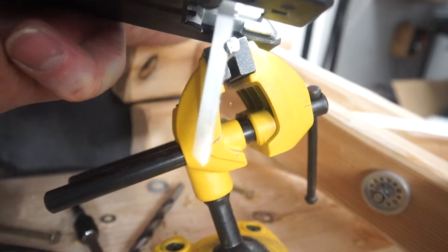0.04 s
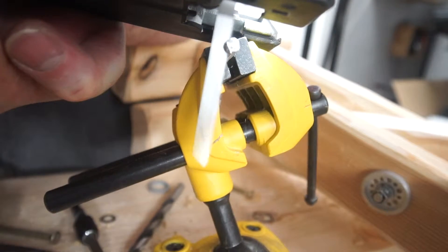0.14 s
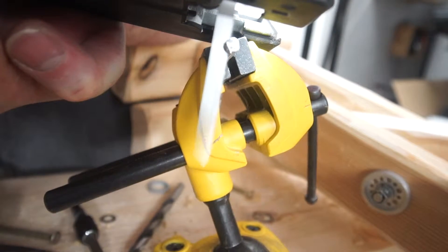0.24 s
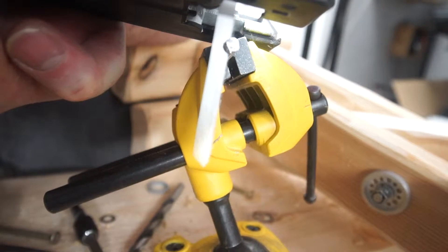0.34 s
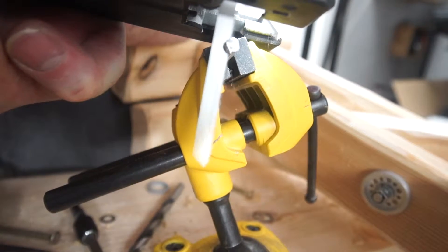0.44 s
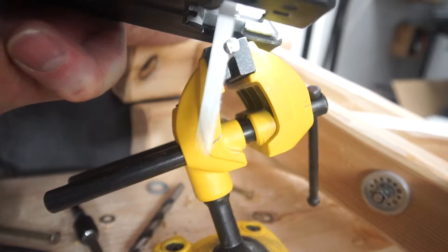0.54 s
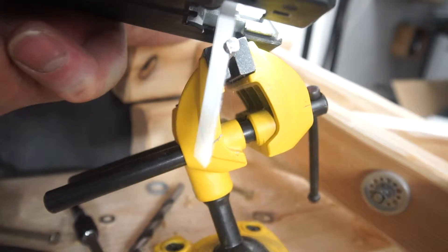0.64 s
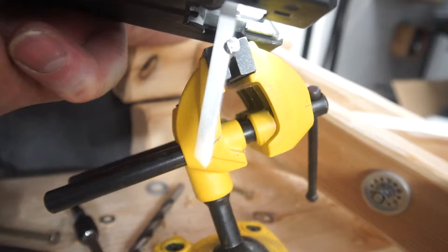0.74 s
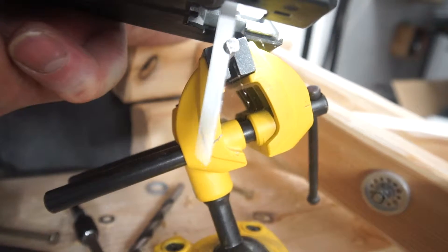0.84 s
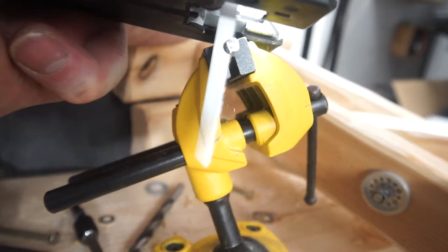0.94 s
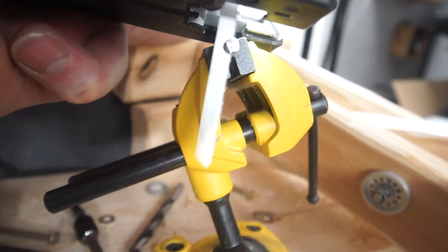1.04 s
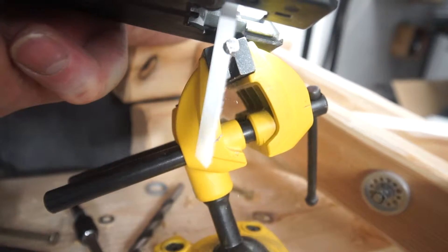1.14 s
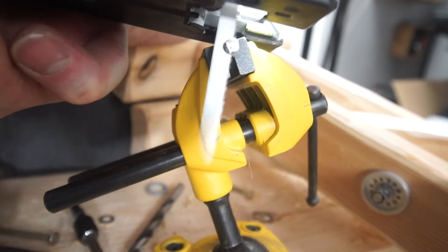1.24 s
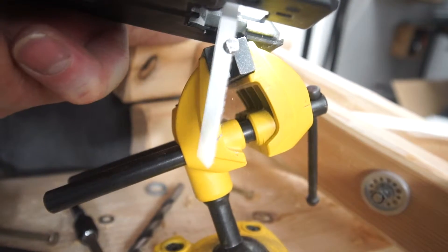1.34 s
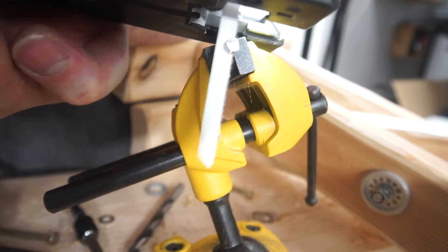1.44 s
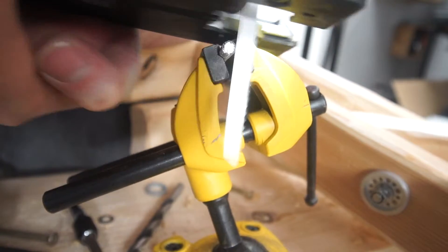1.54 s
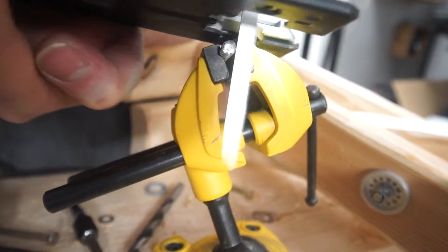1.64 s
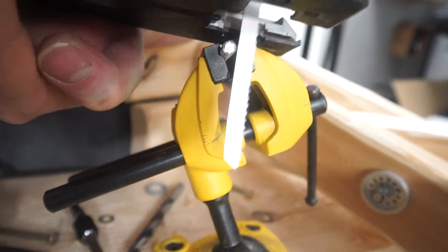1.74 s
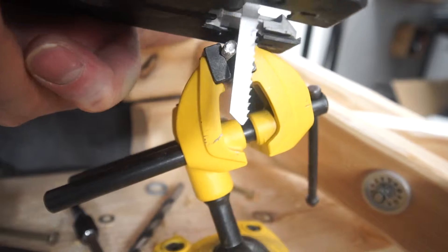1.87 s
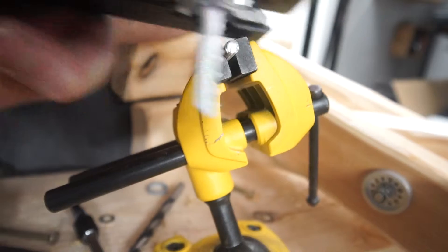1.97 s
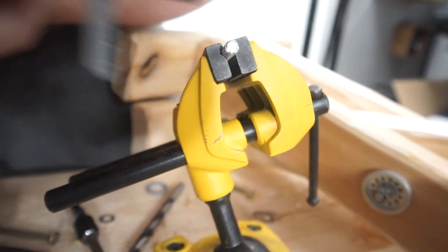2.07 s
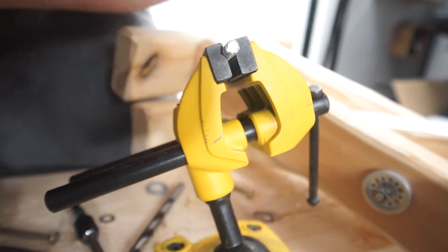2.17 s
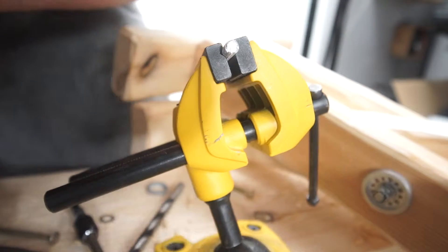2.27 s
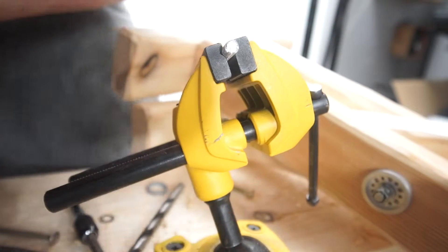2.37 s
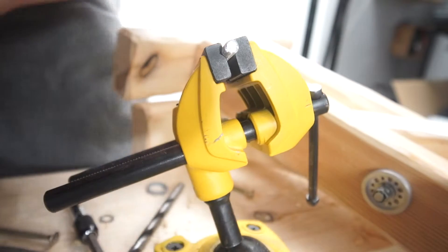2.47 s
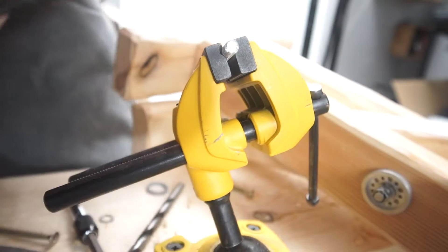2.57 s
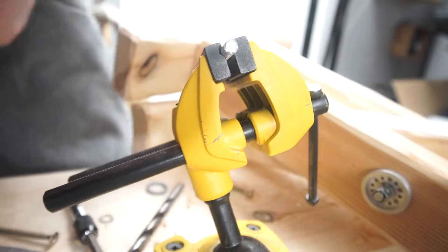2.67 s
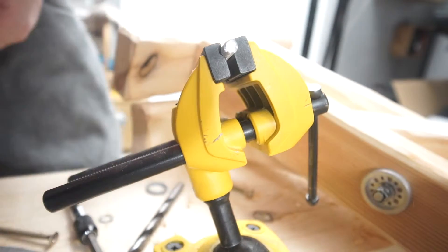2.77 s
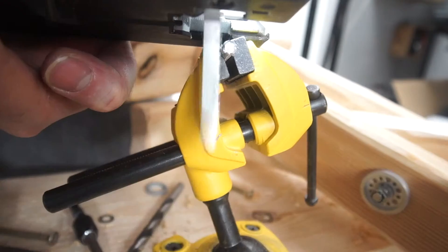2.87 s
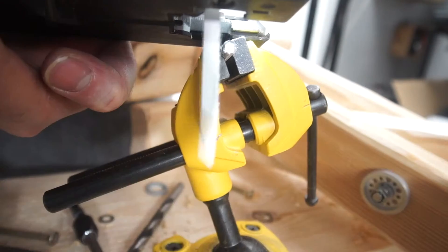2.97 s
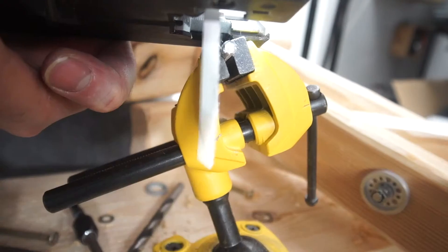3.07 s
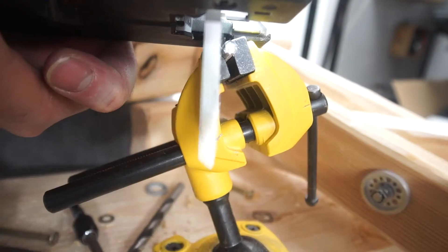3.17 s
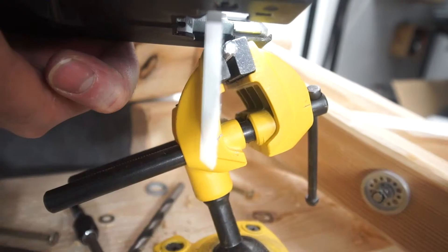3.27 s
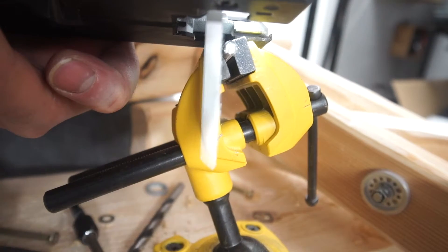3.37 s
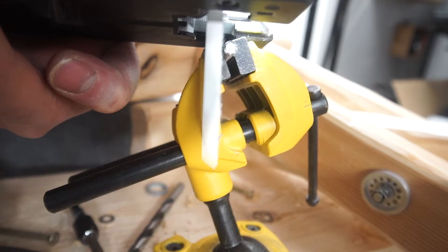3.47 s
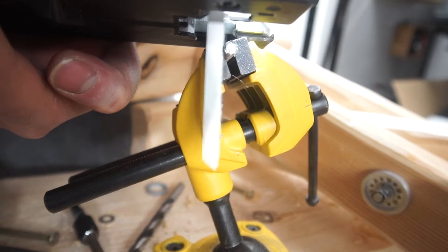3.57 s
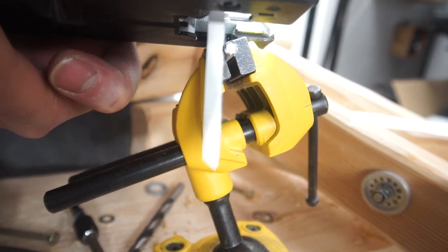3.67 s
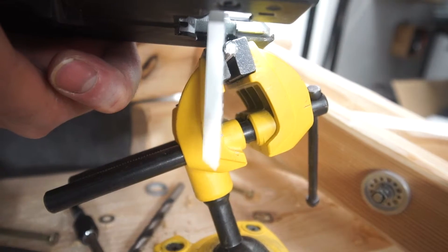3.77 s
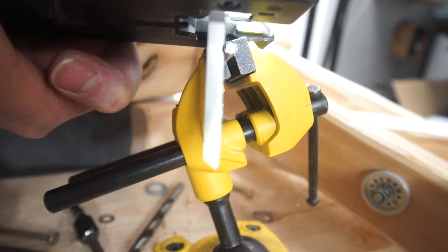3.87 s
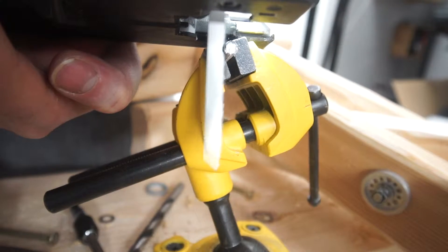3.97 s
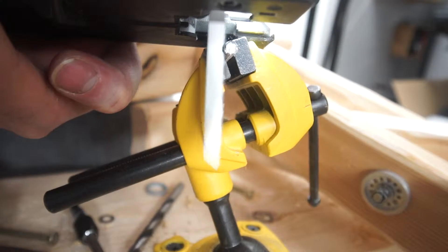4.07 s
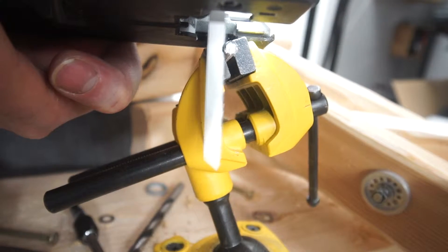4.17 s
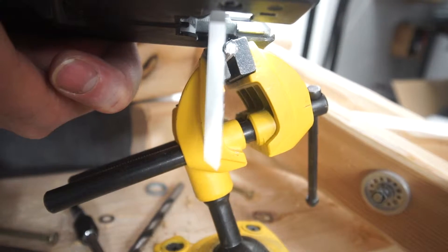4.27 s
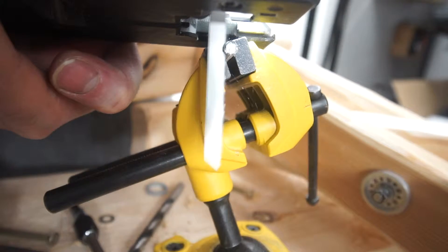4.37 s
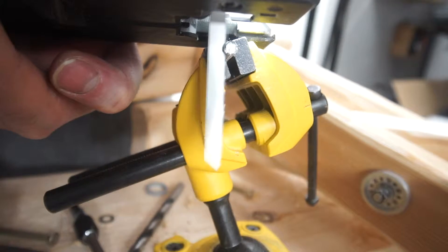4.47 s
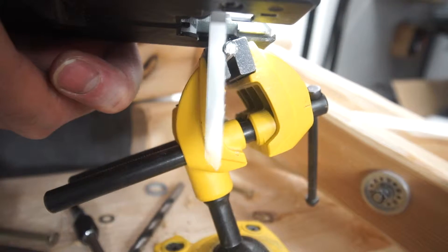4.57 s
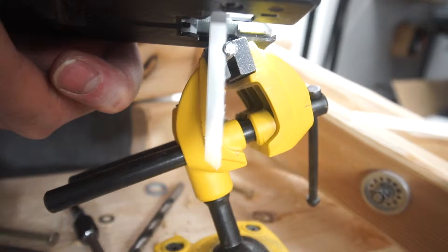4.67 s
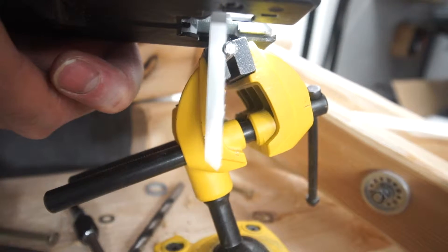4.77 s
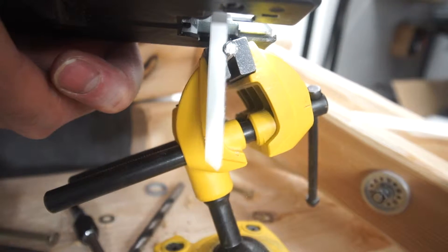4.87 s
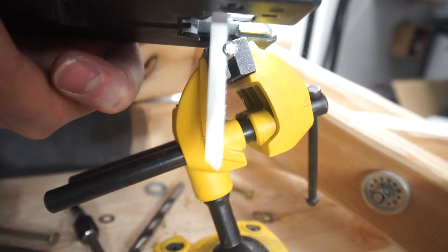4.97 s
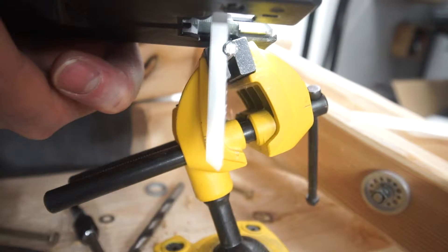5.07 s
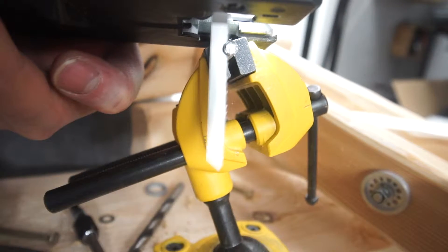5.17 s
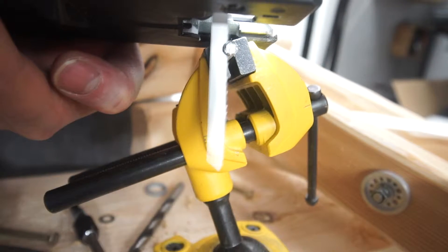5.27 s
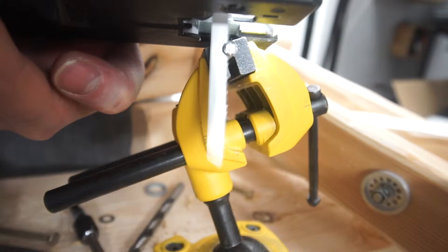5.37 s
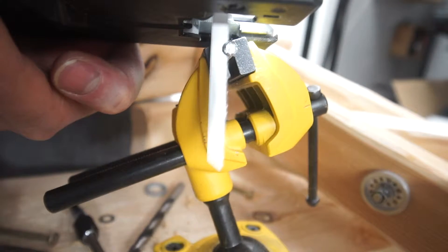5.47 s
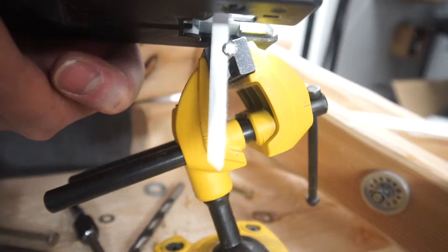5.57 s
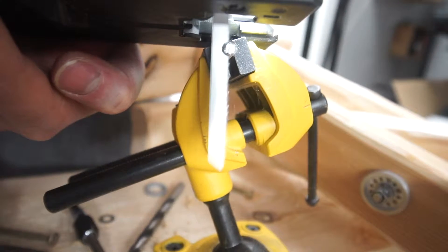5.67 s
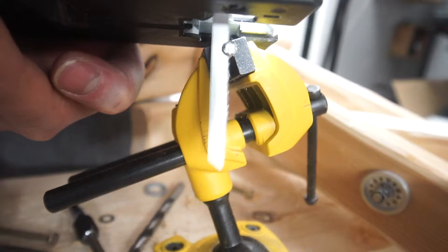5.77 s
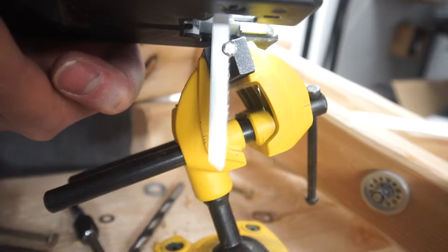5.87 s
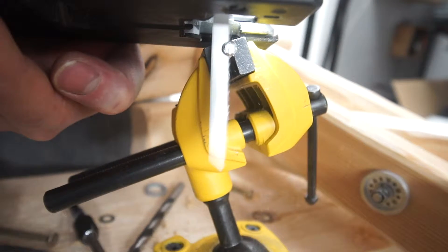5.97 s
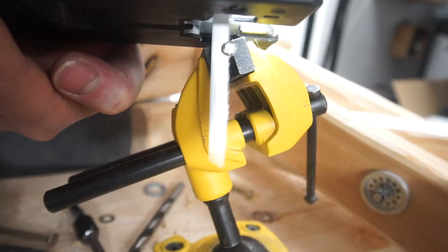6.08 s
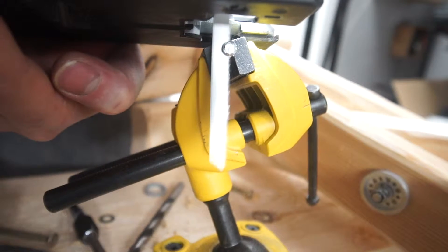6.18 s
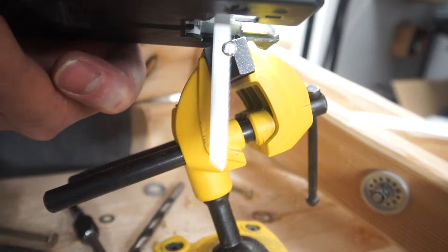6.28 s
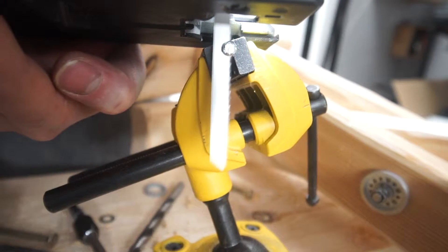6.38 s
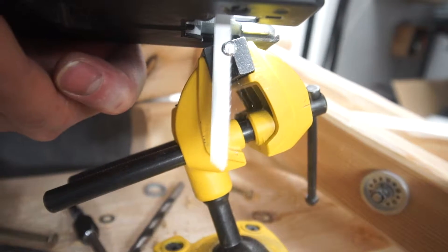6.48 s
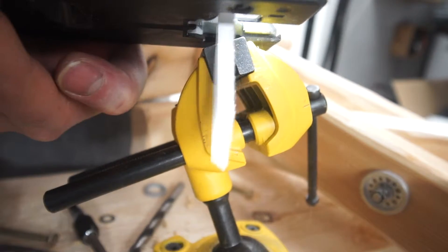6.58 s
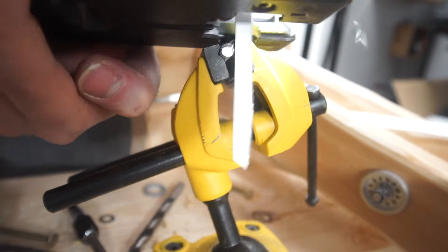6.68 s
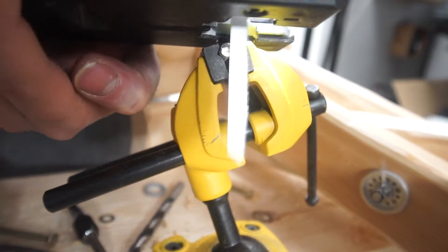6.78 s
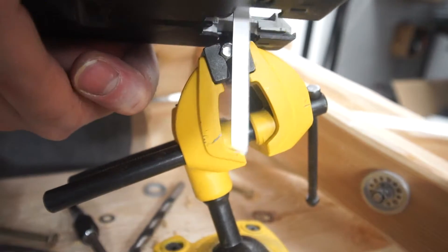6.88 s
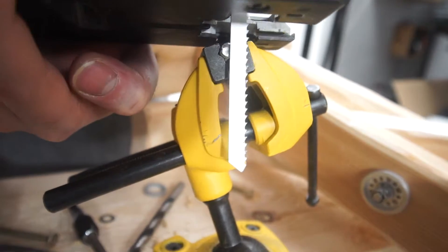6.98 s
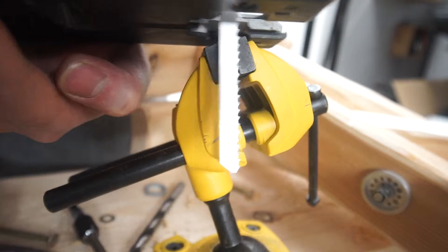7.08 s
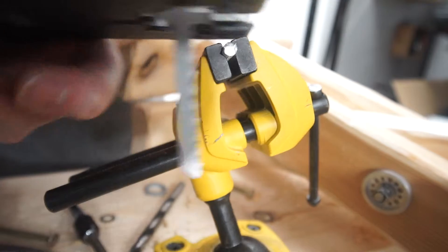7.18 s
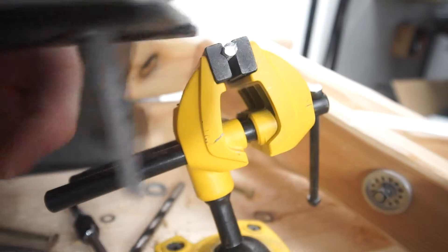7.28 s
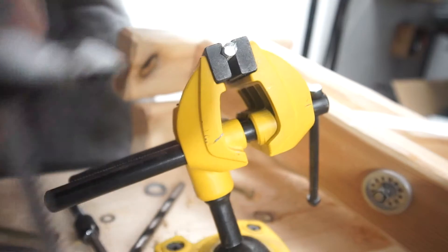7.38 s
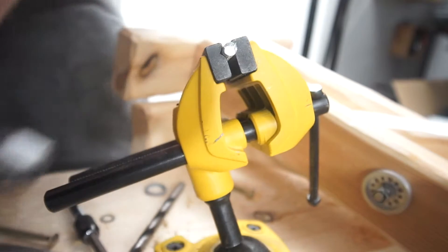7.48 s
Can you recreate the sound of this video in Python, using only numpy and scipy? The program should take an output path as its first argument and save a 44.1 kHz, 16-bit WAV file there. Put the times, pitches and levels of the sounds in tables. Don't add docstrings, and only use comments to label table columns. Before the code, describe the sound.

A handheld electric jigsaw rasps and buzzes through a clamped steel rod, stops with clicks and soft thuds, then restarts, cuts again and stops.

```python
import sys
import numpy as np
from scipy import signal
from scipy.fft import rfft, irfft, next_fast_len
from scipy.io import wavfile
from scipy.ndimage import uniform_filter1d, map_coordinates

SR = 44100
rng = np.random.default_rng(int(sys.argv[2]) if len(sys.argv) > 2 else 0)


def level_to_linear(level):
    exponent = np.asarray(level, float) / 20
    return 10 ** exponent


def waveform_to_disk(signal):
    frames = np.transpose(np.atleast_2d(signal))
    scaled = np.clip(frames, -1, 1) * 32767
    samples = np.round(scaled).astype(np.int16)
    wavfile.write(sys.argv[1], SR, samples)


N = 331493

# start_s, teeth_touch_s, teeth_lift_s, trigger_off_s, tool_muffled_s
RUNS = [
    (-1, -1, 1.535, 1.725, 1.78),
    (2.953, 3.1, 6.57, 6.82, 6.9),
]
BITE_AT = [.2015, 3.348]
# time_s, strokes_per_s
LOADED_SPEED = [
    [(0, 37.0), (1.5, 37.0)],
    [(3.3, 41), (3.51, 42), (3.64, 41.15), (3.78, 41.75), (4.42, 41.8), (4.53, 41.35), (6.0, 41.35),
     (6.5, 41.05)],
]
FREE_SPEED = [38.1, 41.86]
BRAKE = [72, 95]
GEAR, FAN_BLADES, SEGMENTS = 9.2, 15, 29
UNLOAD_S = .1
COAST_DB = -18

# pitch_hz, level_db_per_hz
WHIR = [
    [(35, -68.5), (60, -27), (153, 4.5), (288, -39.5), (343, -17), (391, -44.5), (497, 8), (1020, 2),
     (1420, 8), (1720, 4), (2100, 1.5), (2850, -1), (11000, -4), (14300, -102.5), (22000, -120)],
    [(35, -54.5), (60, -15.5), (160, -11), (270, -25), (383, -41), (646, -8.5), (1160, -0.5), (1360, -2.5),
     (2780, -4), (5020, -7.5), (5840, -5), (6380, -12.5), (11000, -10), (14300, -103), (22000, -120)],
]
# pitch_hz, width_hz, level_db
HOUSING = [
    [(1020, 110, 0), (1200, 70, -3), (1720, 110, 2), (2650, 260, -5), (3170, 160, -6)],
    [(1160, 60, -2), (1730, 150, -7), (2780, 220, -8), (3170, 120, -5), (540, 120, -6)],
]
# hum_free_db, hum_loaded_db
WHIR_DB = [(-36.5, -42, -39, -42.5, -14, -17), (-33.5, -36, -39.5, -37, -17.5, -26.5)]
IDLE_SHAKE_DB = [-29.5, -36]
IDLE_SHELL_DB = [5.5, -0.5]
IDLE_RUMBLE_DB = [-21, -33.5]

# time_s, push_db, lean_to_vise_db, bite_sharpness
PUSH = [
    [(0, -35.5, 3.5, 0.86), (.25, -36.5, -3, 0.85), (.5, -36, -4, 0.97), (.7, -37, -4, 1),
     (.9, -37, -2.5, 1), (1.1, -38, -0.5, 1), (1.3, -38, 0, 1), (1.45, -39, 6.5, 1), (1.53, -37.5, 5, 0.95)],
    [(3.2, -41.5, 6.5, 1), (3.3, -42.5, 11.5, 1), (3.55, -38.5, 7, 1.1), (3.8, -38.5, 6.5, 1.2),
     (3.96, -41.5, 5, 0.88), (4.15, -38, 4, 1), (4.45, -37.5, 0.5, 0.79), (4.75, -35.5, 0.5, 0.78),
     (5.1, -37, -0.5, 0.76), (5.55, -37.5, -8.5, 1.15), (5.85, -36.5, -4, 0.93), (6.1, -37.5, -6, 1.5),
     (6.35, -38, -2, 0.71), (6.55, -36.5, 4.5, 1.2)],
]
# vise_db, rod_db, blade_db, bench_shake_db
PART_DB = [(-9.5, -7.5, -7, -24), (-8.5, -5, -7, -21.5)]
LIFT_DB_PER_S = [-1000, -110]
# pitch_hz, width_hz, level_db, lag_strokes
RINGS = [
    [(452.6, 12, 1, 0.51), (535, 67, -4.5, 0.43), (835, 78, 1.5, -.05), (1170, 50, -6.5, -0.15),
     (1692, 97, 2.5, 0.11), (1895, 73, 2, 0.12), (2108, 34, 3, 0.13), (2893, 100, -1, 0.09),
     (3123, 120, 0, .02), (3450, 110, -9, 0.074), (3710, 39, -6.5, 0.18), (5800, 230, -3.5, -0.046),
     (7400, 87, -8.5, -0.089), (9230, 95, -12.5, 0.3)],
    [(467, 45, 0.5, 0.35), (485, 41, -6, 0.38), (947, 67, 1, -0.075), (1149, 48, -6.5, -0.25),
     (1424, 54, -0.5, 0.14), (1704, 58, -9, .05), (1950, 44, -4, .05), (2111, 28, 0, .05),
     (2164, 16, -0.5, .05), (2520, 100, -1.5, 0.074), (2880, 240, 0, 0.046), (3420, 130, -5.5, 0.04),
     (3650, 50, -11.5, 0.18), (9230, 43, -10, 0.066)],
]
# pitch_hz, share_0_to_1
FOLLOW = [(500, .35), (900, .7), (2150, .5), (2850, .8), (3460, .9), (5500, .5), (9000, .4)]
# time_s, pitch_ratio
JAW = [
    [(0, 1), (1.5, 1)],
    [(3.3, .97), (3.5, 1.04), (3.6, 1.08), (3.66, 1.04), (3.85, 1.14), (4.25, 1.17), (5.0, 1.17),
     (5.6, 1.1)],
]
JAW_STEADY = [.6, .85]
# pitch_hz, level_db_per_hz
RASP = [(59, -18.5), (100, -7.5), (267, -4), (532, 1), (635, -8), (2150, 1.5), (2330, 2), (3450, -11),
        (3960, -4), (11000, -8.5), (14300, -86), (22000, -120)]
SQUEAL_HZ = [3485, 3440]
# stroke_multiple, level_db
SHAKE = [
    [(1, 2.5), (2, -7.5), (3, -9), (4, -7.5), (5, 0), (6, -1.5), (7, 3), (8, -7.5), (9, 5), (10, -26),
     (11, -5)],
    [(1, 0.5), (2, 2), (3, 3.5), (4, 7), (5, -27), (6, -3), (7, -19.5), (8, 3), (9, -41), (10, -23),
     (11, -19.5)],
]

# pitch_hz, likeness_0_to_1
SAME = [(60, 1), (350, 0.94), (840, 0.69), (1700, 0.47), (3500, 0.23), (5000, 0.12), (6500, 0.13),
        (9000, 0.56)]
# pitch_hz, left_minus_right_db
LEAN = [(60, 1.5), (170, -1), (500, -0.5), (1420, -1.5), (4090, 0.5), (11800, 1)]
# pitch_hz, lead_radians
LEAD = [(0, -0.5), (350, -0.22), (2400, -0.46), (3450, -0.87), (4300, -0.3), (5700, -4.5), (7400, -7.5),
        (12000, -4)]

# start_s, peak_db, left_minus_right_db
CLICKS = [
    (1.947, -31.5, 2),
    (2.251, -34.5, 1),
    (2.426, -63, -10),
    (7.143, -27, 1),
    (7.297, -67, 12),
    (7.332, -59, -6),
]
# pitch_hz, level_db, fall_60db_s
CLICK_MODES = [
    [(1605, -3, 0.027), (1755, -5, 0.034), (2540, -2, 0.028), (2940, -8, .025), (3630, 1, .02),
     (4260, 0, .02), (5360, -1, 0.017), (6960, -13, .015), (7850, -14, .015)],
    [(578, -10, 0.08), (934, -10, 0.045), (1433, -2, 0.035), (2044, -3, .02), (2870, -12, .02),
     (3640, -2, .025), (4400, -16, .02), (5814, -20, .015)],
    [(1420, -7, .03), (1950, 0, 0.016), (3483, -24.5, .02)],
    [(997, -8, 0.066), (1430, -10, 0.055), (1980, -7, 0.026), (2890, 2, 0.019), (3190, -1.5, .02),
     (3900, -10, .035), (4960, -14, .02), (7540, -20, .015)],
    [(2643, -4, .02), (3000, 0, 0.018), (5300, -8, .02)],
    [(805, -8, 0.027), (1335, -4, 0.036), (2020, -6, .02), (2600, -6, .02)],
]
# pitch_hz, level_db_per_hz
CRACKS = [
    [(88, -39), (150, -6.5), (1180, -10), (1610, -1), (2350, -2), (3610, -4), (11000, -18), (14300, -52),
     (22000, -120)],
    [(88, -46), (150, -6), (1470, -7.5), (3300, -5), (3610, -7), (5360, -18), (11000, -32), (14300, -63),
     (22000, -120)],
    [(88, -35), (150, -5), (1890, -3), (2300, -5), (2760, -9), (4480, -13), (11000, -19.5), (14300, -55),
     (22000, -120)],
]
# start_s, peak_db, left_minus_right_db
THUDS = [
    (2.6, -52.5, 1.5),
    (2.624, -52, 0.0),
    (2.783, -47, 0.0),
]
# pitch_hz, level_db, fall_60db_s
THUD_MODES = [(195, 3, 0.18), (424, 5.5, 0.15), (586, 4.5, 0.038), (1370, -22, 5.0), (2000, -28, 0.43),
              (2993, -41, 5.0)]
# pitch_hz, level_db_per_hz
THUMP = [(60, -31), (150, -11), (450, -1.5), (1000, -11), (2050, -16), (3000, -32), (5000, -46),
         (8000, -59), (15000, -88)]
# middle_s, level_db, length_s
SCUFFS = [
    (2.216, -75, 0.02),
    (2.37, -70, 0.015),
    (7.091, -74, 0.039),
]

# pitch_hz, fall_60db_s
SHOP = [(200, 0.51), (530, 0.38), (1390, 0.28), (3680, 0.28), (9700, 0.36)]
# pitch_hz, level_db_per_hz
AIR = [(35, -26), (60, 0), (132, 6), (213, -6.5), (466, -5), (660, -9), (1390, -8), (1610, -22),
       (1880, -13), (7590, -24.5), (11000, -33.5), (14300, -61), (22000, -120)]


def jigsaw():
    out = np.zeros((2, N))
    for run, end_s in enumerate((1.96, 7.15)):
        t = np.arange(max(RUNS[run][0], 0), end_s, 1 / SR)
        hunting = .02 * load(run, t) * wander(len(t), 7)
        strokes = np.cumsum(stroke_rate(run, t)) / SR + hunting
        strokes = strokes - np.interp(BITE_AT[run], t, strokes)
        add(out, t[0], motor(run, t, strokes) + cut(run, t, strokes))
    return ports(out)


def motor(run, t, strokes):
    lift = RUNS[run][2]
    whir_db, fan_db, segment_db, hum_db = motor_levels(run, t, stroke_rate(run, t))
    crank = np.cos(2 * np.pi * strokes)
    rotor = 2 * np.pi * GEAR * (strokes + .0005 * crank)
    noise = rng.standard_normal((2, len(t))) * (1 + 0.22 * np.cos(rotor)) * (1 + 0.023 * crank)

    housing = sum(level_to_linear(db) * np.sqrt(width) * evened(ring(noise, hz, width))
                  for hz, width, db in HOUSING[run])
    shell = level_to_linear(-3 - 3 * run + IDLE_SHELL_DB[run] * (1 - load(run, t)))
    gears = evened(coloured(noise, WHIR[run]))
    dull = signal.lfilter(*signal.butter(2, 4000, fs=SR), gears)
    speed = np.gradient(strokes) * SR / FREE_SPEED[run]
    hiss = np.clip(speed * 1.1, 0, 1) ** 0.94
    whir = dull + hiss * (gears - dull) + shell * evened(housing)
    rumble = level_to_linear(IDLE_RUMBLE_DB[run] + 5 - 61 * abs(t - lift))
    whir += rumble * evened(ring(noise, 87, 90)) * (t > lift)

    drift = 1.5 * wander(len(t), 20)
    tones = level_to_linear(hum_db) * np.cos(rotor)
    for count, db in ((FAN_BLADES, fan_db), (SEGMENTS, segment_db)):
        tones = tones + level_to_linear(db + 1.5 * wander(len(t), 20)) * np.cos(count * rotor + drift)
    return level_to_linear(whir_db) * (whir + tones * [[1.3], [.5]])


def motor_levels(run, t, rate):
    on, touch, lift, off, shut = RUNS[run]
    *whir_steps, hum_db, loaded_db = WHIR_DB[run]
    after, busy = np.maximum(t - shut, 0), load(run, t)
    touch, seat_s = max(touch, 0), .5
    start_db = -9.5

    whir_db = np.interp(t, [touch, touch + seat_s, lift, lift + UNLOAD_S], whir_steps)
    whir_db = whir_db + start_db * np.exp(-(t - on) / .07)
    whir_db += np.maximum(-400 * after, -9 - 170 * after)
    coast_db = COAST_DB * np.clip(after / 0.011, 0, 1)

    duct_hz, duct_width_hz = 5780, 140
    fan_hz = FAN_BLADES * GEAR * rate
    fan_db = np.maximum(-5 - ((fan_hz - duct_hz) / duct_width_hz) ** 2, -26)
    segment_db = -12 - ((rate - 36) / 3.4) ** 2 - 13 * busy
    hum_db = hum_db + (loaded_db - hum_db) * busy + start_db * np.exp(-(t - on) / 0.088)
    return whir_db, fan_db + coast_db, segment_db + coast_db, coast_db + hum_db


def load(run, t):
    on, touch, lift, off, shut = RUNS[run]
    settle_s = .25
    return np.clip(np.minimum((t - touch) / settle_s, 1 - (t - lift) / UNLOAD_S), 0, 1)


def stroke_rate(run, t):
    on, touch, lift, off, shut = RUNS[run]
    initial, spin_up, knee = 19, 95, 1.5
    running = np.interp(t, *np.transpose(LOADED_SPEED[run]))
    running = running + (FREE_SPEED[run] - running) * np.clip((t - lift) / UNLOAD_S, 0, 1)
    coasting = FREE_SPEED[run] - BRAKE[run] * (t - off)
    return slower(slower(initial + spin_up * (t - on), running, knee), coasting, knee / 2)


def slower(a, b, knee):
    return -knee * np.logaddexp(-a / knee, -b / knee)


def cut(run, t, strokes):
    size = len(t)
    vise_db, rod_db, blade_db, bench_db = cut_levels(run, t)
    locked, loose = teeth(size, strokes), evened(tooth_blows(size))
    grip = level_to_linear(rng.uniform(-2, 1.5, 400))[np.floor(strokes + .5).astype(int) % 400]
    sharp = np.interp(t, *np.transpose(PUSH[run])[[0, 3]])

    def bite(lag, share):
        share = np.clip(share * sharp, 0, 1)
        phase = 2 * np.pi * (strokes - lag)
        pulse = np.exp(1.9 * (np.cos(phase - .4 * np.cos(phase)) - 1))
        return evened(1 - share + share * grip * 2 * pulse)

    low = signal.lfilter(*signal.butter(2, 4300, fs=SR), loose)
    both_ways = 1 + 0.3 * np.cos(2 * np.pi * strokes) + 0.51 * np.cos(4 * np.pi * (strokes - .05))
    rasp = low * bite(0, .55) + (loose - low) * both_ways
    rasp_db = uniform_filter1d(np.maximum(rod_db, blade_db), size=6000) + 1.26
    out = level_to_linear(rasp_db) * evened(coloured(rasp, RASP))

    comb = evened(sum(np.cos(2 * np.pi * k * (strokes + k / 7)) for k in range(9, 16)))
    jaw_hz = RINGS[run][0][0]
    for hz, width, db, lag in RINGS[run]:
        repeat = np.clip(1.03 * 900 / (900 + hz) + 0.25, 0, 1)
        drive = repeat * locked + np.sqrt(1 - repeat ** 2) * loose
        drive = drive * bite(lag, read(FOLLOW, hz))
        if hz > jaw_hz:
            rung = ring(drive, hz, width)
        else:
            drive = JAW_STEADY[run] * .12 * comb + (1 - JAW_STEADY[run]) * drive
            rung = glide(drive, hz * np.interp(t, *np.transpose(JAW[run])), width)
        part = np.interp(np.log(hz), np.log([500, 2150, 3450]), [0, 1, 2])
        parts_db = enumerate((vise_db, rod_db, blade_db))
        force_db = sum(max(1 - abs(part - k), 0) * part_db for k, part_db in parts_db)
        out += level_to_linear(force_db + db - 2.0 + .9 * wander(size, 6.84)) * steady(rung)

    slip = np.cumsum(SQUEAL_HZ[run] + 36 * wander(size, 60)) / SR
    squeal = bite(.05, 1.2) * np.sqrt(2) * np.cos(2 * np.pi * slip)
    out += level_to_linear(blade_db + 2.5 + 1.2 * wander(size, 25)) * squeal * [[1.2], [.6]]
    shake = sum(level_to_linear(db + 2.5 * wander(size, 4.6)) * np.cos(2 * np.pi * (k * strokes + rng.random()))
                for k, db in SHAKE[run])
    return out + level_to_linear(bench_db + 1.45) * shake * [[1], [.1]]


def cut_levels(run, t):
    on, touch, lift, off, shut = RUNS[run]
    s, push_db, lean_db, _ = np.transpose(PUSH[run])
    push_db, lean_db = np.interp(t, s, push_db), np.interp(t, s, lean_db)
    push_db += -3.5 * np.exp(-np.maximum(t - touch, 0) / 0.15)
    push_db += LIFT_DB_PER_S[run] * np.maximum(t - lift, 0)
    push_db += -120 * np.clip(np.maximum(touch - t, t - lift - UNLOAD_S) / .02, 0, 1)
    lean_shares = (0.97, 0.0055, -0.12, 0.13)
    *steel_db, bench_db = [push_db + db + share * lean_db + .7 * wander(len(t), 12)
                           for db, share in zip(PART_DB[run], lean_shares)]
    whir_db = motor_levels(run, t, stroke_rate(run, t))[0]
    idle_db = whir_db + IDLE_SHAKE_DB[run] + COAST_DB * (t > shut)
    return *steel_db, np.maximum(bench_db, idle_db)


def tooth_blows(*shape):
    blows = rng.standard_normal((2, *shape))
    return blows * level_to_linear(1.4 * np.minimum(rng.exponential(1, shape), 4))


def teeth(size, strokes):
    patterns = tooth_blows(40, 1100)
    place = (strokes % 1 * 1100).astype(int)
    wear = np.arange(size) / SR * 3.5
    old, blend = wear.astype(int), wear % 1 * np.pi / 2
    return evened(np.cos(blend) * patterns[:, old, place] + np.sin(blend) * patterns[:, old + 1, place])


def ring(x, hz, width):
    r = np.exp(-np.pi * width / SR)
    return signal.lfilter([1, 0, -1], [1, -2 * r * np.cos(2 * np.pi * hz / SR), r * r], x)


def glide(x, hz, width):
    turn, r = np.exp(2j * np.pi * np.cumsum(hz) / SR), np.exp(-np.pi * width / SR)
    return (turn * signal.lfilter([1 - r], [1, -r], x / turn)).real


def steady(x):
    return x / np.sqrt(abs(uniform_filter1d((x ** 2).mean(0), 2400)) + 1e-20)


def ports(pair):
    size = next_fast_len(pair.shape[1])
    hz, (a, b) = np.fft.rfftfreq(size, 1 / SR), rfft(pair, size)
    spread = np.arccos(np.clip(read(SAME, hz), 0, 1)) / 2
    left, right = (np.cos(spread) * a + side * np.sin(spread) * b for side in (1, -1))
    lean = level_to_linear(read(LEAN, hz) / 2)
    right = right * np.exp(-1j * read(LEAD, hz))
    return irfft(np.array([left * lean, right / lean]), size)[:, :pair.shape[1]]


def handling():
    out = np.zeros((2, N))
    metal_s, wood_s = 0.06, .08
    for (s, db, pan_db), modes, k in zip(CLICKS, CLICK_MODES, (0, 1, 1, 2, 0, 2)):
        crack_db = -9.5 if db > -50 else -16
        add(out, s, knock(db, pan_db, modes, CRACKS[k], metal_s, crack_db, crack_s=.008))
    for s, db, pan_db in THUDS:
        add(out, s, knock(db, pan_db, THUD_MODES, THUMP, wood_s, crack_db=-13.5, crack_s=0.036))
    for s, db, length in SCUFFS:
        t = np.arange(-2000, 2000) / SR
        brush = evened(coloured(rng.standard_normal((2, len(t))), CRACKS[0]))
        add(out, s + t[0], level_to_linear(db) * np.exp(-(t / length) ** 2) * brush)
    return signal.lfilter(*signal.butter(2, 130, "high", fs=SR), out)


def knock(db, pan_db, modes, colour, ring_s, crack_db, crack_s):
    t, rise_s = np.arange(5000) / SR, .0012
    body = sum(level_to_linear(level - 60 * t / min(t60, ring_s)) * np.sin(2 * np.pi * (hz * t + rng.random()))
               for hz, level, t60 in modes)
    body = body / abs(body[60:]).max()
    crack = evened(coloured(rng.standard_normal((2, len(t))), colour)) * np.exp(-t / crack_s)
    sound = body + level_to_linear(crack_db) * (crack[0] + 0.88 * crack)
    sound = sound * np.minimum(t / rise_s, 1)
    return level_to_linear(db + 3.5) * sound * level_to_linear([[pan_db / 2], [-pan_db / 2]])


def shop(drone, hits):
    taps = np.zeros((3, 2, SR))
    at = np.arange(200, SR - 20, 20) + rng.integers(0, 20, (3, 2, (SR - 201) // 20))
    np.put_along_axis(taps, at, rng.choice([-1., 1.], at.shape), 2)
    taps = taps + 0.27 * taps[:, ::-1]
    hz, t, z = signal.stft(taps, SR, nperseg=256)
    tails = signal.istft(z * level_to_linear(-60 * t / read(SHOP, hz)[:, None]), SR, nperseg=256)[1]
    tails = tails / np.linalg.norm(tails[0, 0])
    turns = np.cos(2 * np.pi * (np.arange(N) / SR * 90 + np.arange(3)[:, None] / 3))
    sent = np.sqrt(2 / 3) * turns * hits.mean(0) + drone.mean(0) / np.sqrt(3)
    return signal.fftconvolve(sent[:, None], tails, axes=2)[..., :N].sum(0)


def air():
    noise = rng.standard_normal((2, N))
    whistle = evened(ring(noise, 6500, 150))
    hush = evened(coloured(noise + 0.42 * noise[::-1], AIR)) + level_to_linear(-20.5) * whistle
    return level_to_linear(-82 + 0.5 + 2.0 * wander(N, 1.2)) * hush


def evened(x):
    return x / np.sqrt(np.mean(x ** 2) + 1e-20)


def read(points, hz):
    f, value = np.transpose(points)
    return np.interp(np.log(hz + 1), np.log(f + 1), value)


def add(mix, s, sound):
    part = mix[..., round(s * SR):][..., :sound.shape[-1]]
    part += sound[..., :part.shape[-1]]


def coloured(x, spectrum):
    size = next_fast_len(x.shape[-1])
    gain = level_to_linear(read(spectrum, np.fft.rfftfreq(size, 1 / SR)))
    return irfft(rfft(x, size) * gain, size)[..., :x.shape[-1]]


def wander(size, per_s):
    knots = rng.standard_normal(int(size / SR * per_s) + 3)
    steps = np.arange(0, size + 64, 64)
    curve = map_coordinates(knots, [steps / SR * per_s], order=3)
    return evened(np.interp(np.arange(size), steps, curve))


def scene():
    tool, hands = jigsaw(), handling()
    return tool + hands + shop(level_to_linear(-10) * tool, level_to_linear(-7.5) * hands) + air()


def top_cut(x):
    return signal.sosfilt(signal.butter(12, 12360, fs=SR, output="sos"), x)


def record(dry):
    ceiling, edge_hz = .22, 11080
    squashed = ceiling * np.tanh(dry / ceiling)
    low_pass = signal.firwin(511, edge_hz, window=("kaiser", 9), fs=SR)
    limited = signal.oaconvolve(squashed, low_pass[None], "same")
    return top_cut(limited)


dry = scene()
out = record(dry)
waveform_to_disk(out)
```